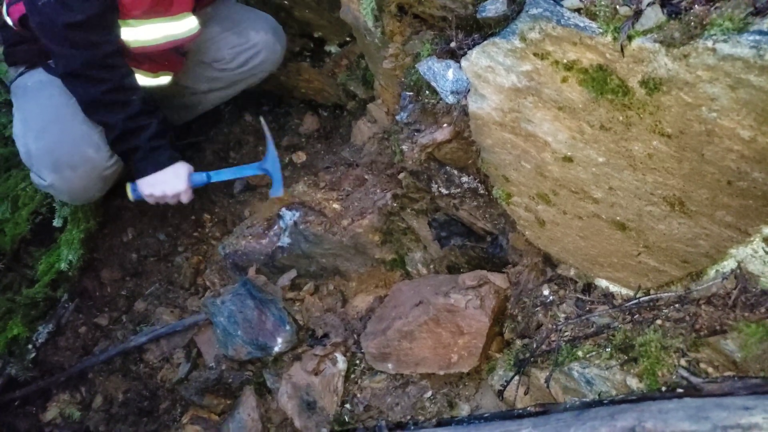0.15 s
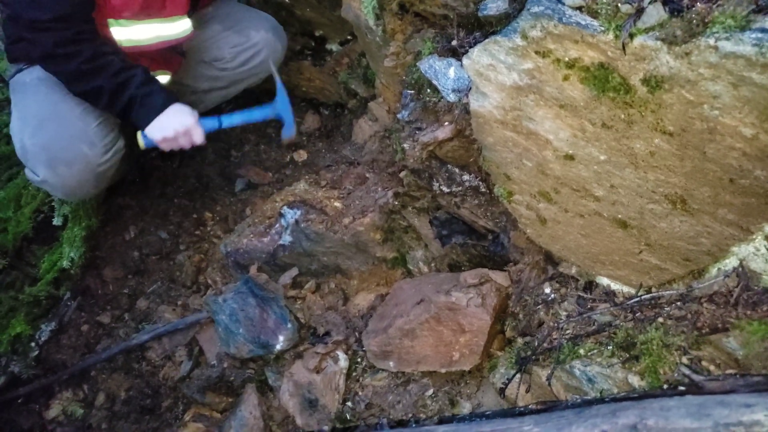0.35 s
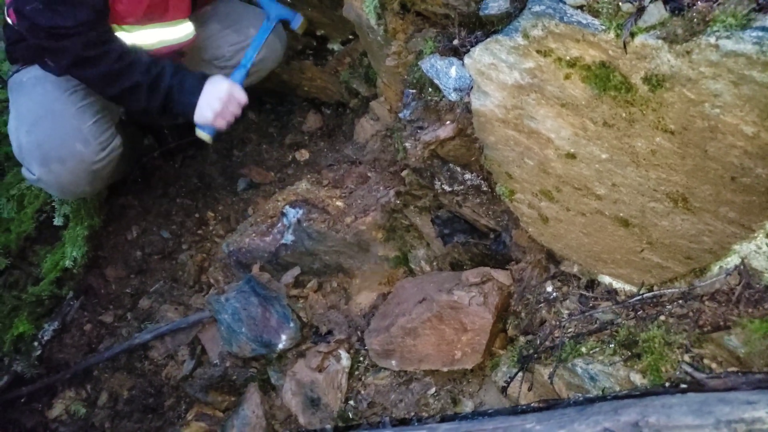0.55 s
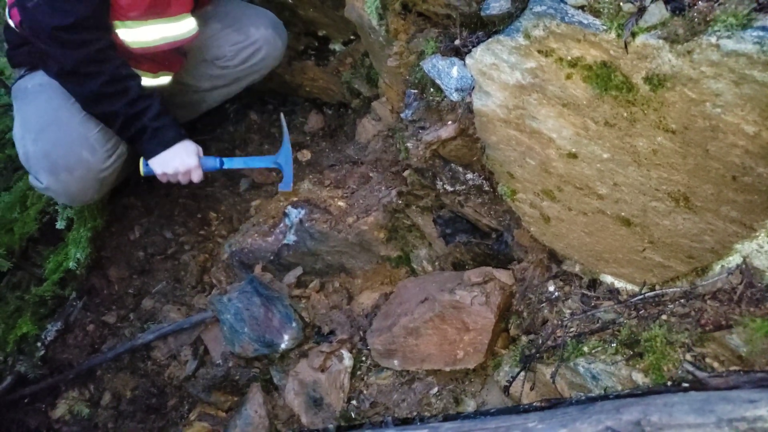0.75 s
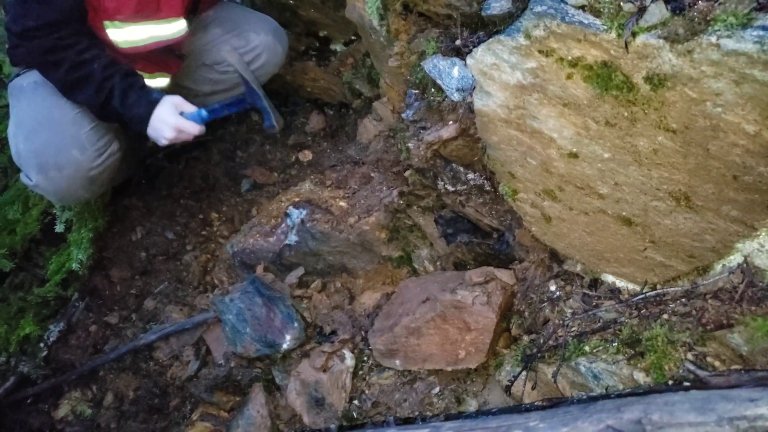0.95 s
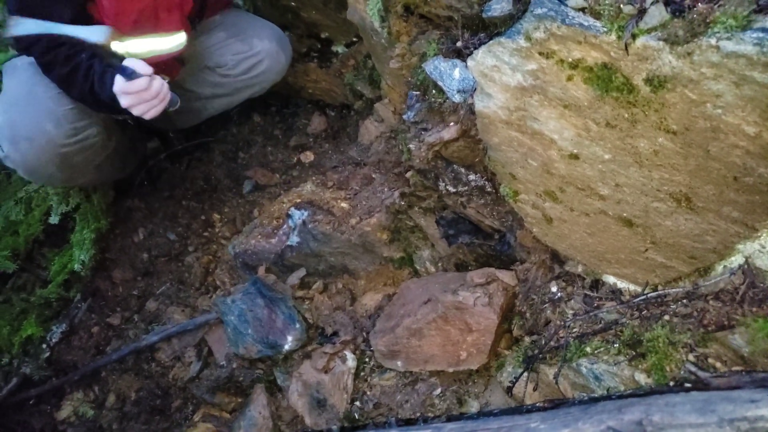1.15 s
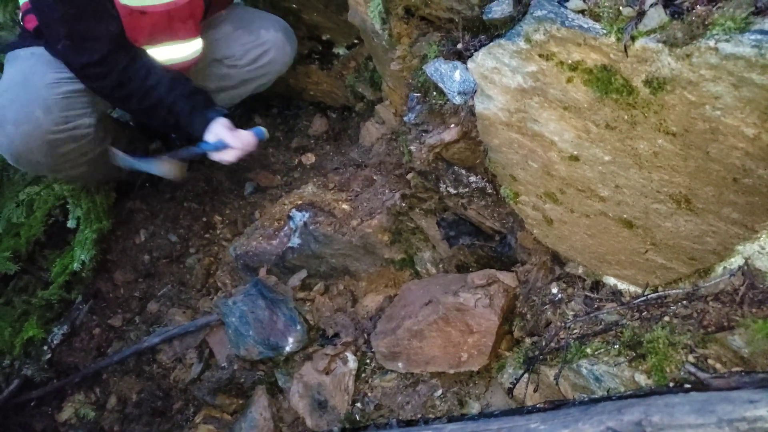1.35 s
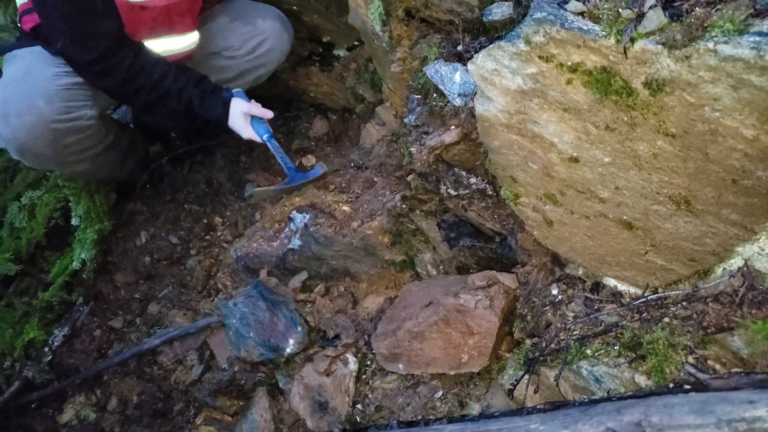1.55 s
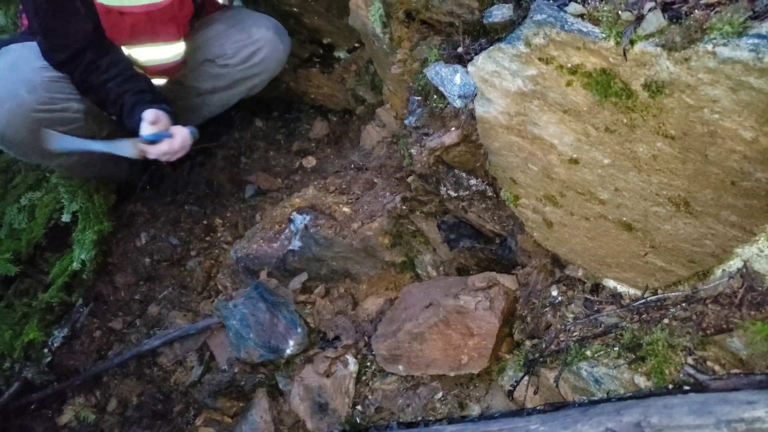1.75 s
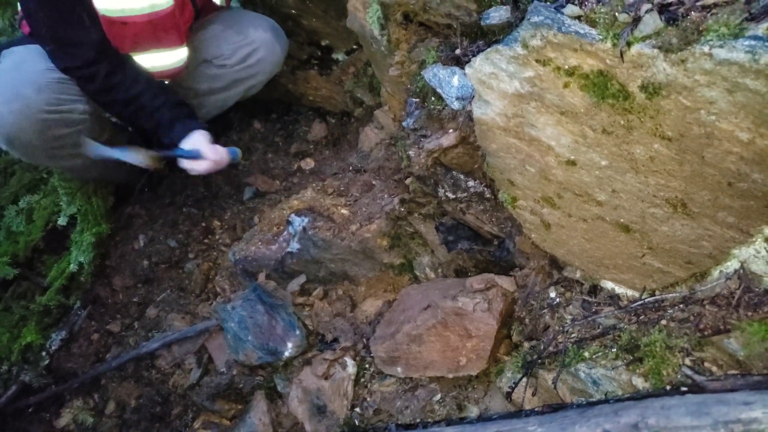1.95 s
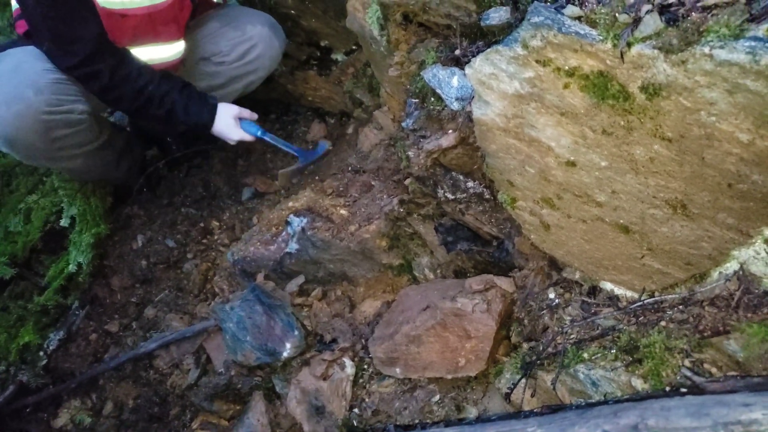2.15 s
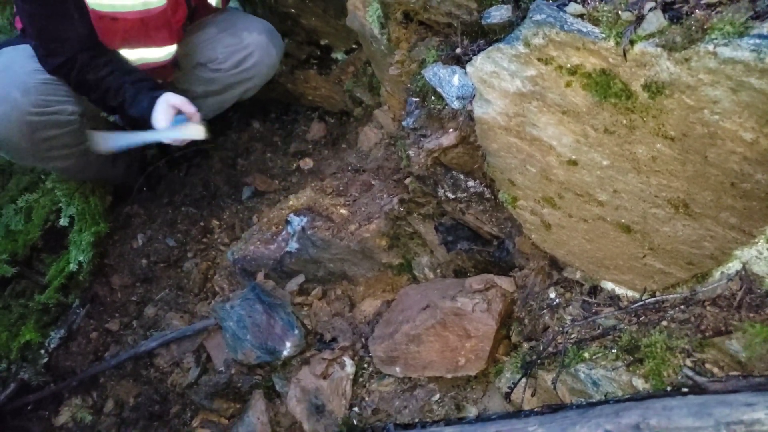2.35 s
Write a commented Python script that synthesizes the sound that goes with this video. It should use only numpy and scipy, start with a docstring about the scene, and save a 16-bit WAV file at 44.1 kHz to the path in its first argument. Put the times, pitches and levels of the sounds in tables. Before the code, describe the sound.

A steel pick strikes rock four times, close and slightly left, at about 0.2, 0.7, 1.5 and 2.1 seconds. Each blow is a dry crack with a short thud, a lighter rebound and a spray of grit; the first and third ring briefly. Small chips tick down between blows, most around 1 second. A sleeve swishes and flaps softly with the swings over a faint outdoor hush.

```python
"""Rock pick on stone

A steel pick strikes weathered rock four times, outdoors and close by, a little to the left.
Each blow is a dry crack over a thud of the ground; the head lands again more lightly and grit sprays.
Chips tick down between blows, and a sleeve swishes and flaps with the swing over a quiet hush."""
import sys
import numpy as np
from scipy import signal
from scipy.fft import rfft, irfft
from scipy.io import wavfile
from scipy.ndimage import uniform_filter1d

SR = 44100
rng = np.random.default_rng(int(sys.argv[2]) if len(sys.argv) > 2 else 0)


def put_to_file(sound):
    """Save the sound as 16-bit audio at rate SR, in the file named by the first command-line argument."""
    columns = np.atleast_2d(sound).T  # one column per channel
    safe = np.clip(columns, -1, 1)
    whole_steps = np.round(safe * 32767)
    wavfile.write(sys.argv[1], SR, whole_steps.astype(np.int16))


N = 105840

# The four blows. Middle and top colour the crack; a fade is the time taken to drop by 60 dB.
# start_s, crack_db, middle_db, top_db, thud_db, contact_hz, contact_db, steel_db, grit_db, crack_fade_s
BLOWS = [(0.2315, -9, -5, 0.5, -16.5, 5580, -6.5, -32, -40, 0.041),
         (0.7375, -10.5, 3.5, 1.5, -13.5, 14530, -19, -56, -45.5, 0.023),
         (1.4987, -13.5, -2, 5.5, -30.5, 6920, -18.5, -29, -45, 0.025),
         (2.1075, -12.5, 3.5, -1, -28.5, 1264, -18.5, -55, -45.5, 0.023)]
# Tone colour of crushing stone: pitch_hz, level_db
CRACK_COLOUR = [(100, -47), (400, 10), (750, -9), (1400, -0.5), (2000, 0), (3500, 0), (5000, -3),
                (7200, 3.5), (8800, -4.5), (11000, -5), (14800, -1.5), (16000, 8.5)]
# Ringing tones of the steel head: pitch_hz, level_db, fade_s
STEEL_TONES = [(6855, 0, .07), (6765, -12, .07)]
NO_TILT = ((1, 0), (2, 0))  # leaves a tone colour unchanged


def amp(db):
    """Turn decibels into a gain."""
    return 10 ** (np.asarray(db) / 20)


def unit(x):
    """Scale a signal to an average power of one."""
    return x / np.sqrt(np.mean(x ** 2) + 1e-20)


def curve_at(points, hz):
    """Read a curve at the given pitches, with octaves evenly spaced."""
    pitches, values = np.transpose(points)
    return np.interp(np.log(hz + 1), np.log(pitches + 1), values)


def add(mix, start_s, sound):
    """Mix a sound in at its start time."""
    part = mix[:, max(round(start_s * SR), 0):][:, :sound.shape[1]]
    part += sound[:, :part.shape[1]]


def noise(colour, size, tilt=NO_TILT):
    """Stereo noise, alike on both sides in the bass; tilt boosts or cuts parts of its colour."""
    # How alike left and right are: pitch_hz, likeness (0 to 1)
    likeness = [(30, .88), (80, .98), (300, .97), (800, .6), (1500, .25), (5000, .1), (15000, .1)]
    hz = np.fft.rfftfreq(size, 1 / SR)
    left, unrelated = np.exp(2j * np.pi * rng.random((2, len(hz))))
    alike = curve_at(likeness, hz)
    right = alike * left + np.sqrt(1 - alike ** 2) * unrelated
    spectrum = np.array([left, right]) * unit(amp(curve_at(colour, hz)))
    return irfft(spectrum * amp(curve_at(tilt, hz)), size) * np.sqrt(size)


def flicker(depth_db, size, grain_samples):
    """A gain that flickers at random, making noise sound rough."""
    wobble = unit(uniform_filter1d(rng.standard_normal(size), grain_samples))
    return unit(amp(depth_db * wobble))


def burst(colour, rise_s, fade_s, size, tilt=NO_TILT):
    """Noise that rises quickly and dies away."""
    t = np.arange(size) / SR
    fade = np.exp(-np.log(1000) * np.maximum(t - rise_s, 0) / fade_s)
    return noise(colour, size, tilt) * np.minimum(t / rise_s, 1) * fade


def ring(tones, rise_s, size=12000, right_delay_s=0.00025):
    """Fading tones, neighbours swinging opposite ways; they reach the right side a little later."""
    t = np.maximum(np.arange(size) / SR - np.array([[0], [right_delay_s]]), 0)
    waves = sum((-1) ** k * amp(db) * np.exp(-np.log(1000) * t / fade_s) * np.sin(2 * np.pi * hz * t)
                for k, (hz, db, fade_s) in enumerate(tones))
    return waves * np.minimum(t / rise_s, 1)


def from_left(sound, share):
    """Sound from the left is shaded on the right side, mostly in the treble."""
    # Full shading of the right side: pitch_hz, cut_db
    shade = [(100, .8), (280, 1.3), (550, 4.5), (1200, 6), (2500, 7), (5500, 9), (9000, 4), (14000, 4.3)]
    spectrum = rfft(sound)
    spectrum[1] *= amp(-share * curve_at(shade, np.fft.rfftfreq(N, 1 / SR)))
    return irfft(spectrum, N)


def hush(level_db=-62, left_louder_db=3.5):
    """Low outdoor rumble with a thin hiss."""
    # Tone colour of the outdoors: pitch_hz, level_db
    hush_colour = [(20, -30.5), (40, -11), (62, 5.5), (110, 2.5), (200, -8.5), (400, -16), (800, -16.5),
                   (1700, -40), (2900, -40.5), (7000, -24.5), (8800, -32.5), (14500, -24.5), (16000, -30.5)]
    sides = amp([[left_louder_db / 2], [-left_louder_db / 2]])
    return amp(level_db) * noise(hush_colour, N) * sides


def sleeve():
    """Cloth rubs as the arm swings, and its folds flap."""
    # Tone colour of rubbing cloth: pitch_hz, level_db
    rub_colour = [(60, 4.5), (200, 9), (500, 1), (1100, -2), (1900, 3.5), (3000, -7), (7200, -4),
                  (9000, -12), (13000, -8), (15500, 2)]
    # Loudness of the rubbing as the arm moves: time_s, level_db
    swing = [(0, -59.5), (0.2, -54), (0.45, -68), (0.62, -73.5), (0.691, -60), (0.8, -65.5), (1.0, -57.5),
             (1.19, -65), (1.25, -57), (1.32, -50.5), (1.46, -51.5), (1.58, -57), (1.7, -67.5),
             (1.97, -67.5), (2.039, -56), (2.16, -59), (2.3, -64.5), (2.39, -54)]
    # Tone colour of a flap: pitch_hz, level_db
    flap_colour = [(50, -19), (180, 7), (400, -12.5), (850, -4), (1400, -31), (4000, -49), (15000, -55)]
    # Soft flaps of cloth: start_s, level_db
    flaps = [(0.175, -44), (0.198, -47), (1.216, -49), (1.288, -48), (1.317, -51), (1.362, -49.5),
             (1.384, -50), (1.404, -47), (1.436, -47), (1.566, -54), (1.616, -52.5), (1.806, -48.5),
             (1.835, -49.5), (1.866, -50), (2.367, -63.5)]
    times_s, levels_db = np.transpose(swing)
    swell = amp(np.interp(np.arange(N) / SR, times_s, levels_db))
    out = noise(rub_colour, N) * swell * flicker(depth_db=1.5, size=N, grain_samples=300)
    for start_s, level_db in flaps:
        add(out, start_s, amp(level_db) * burst(flap_colour, rise_s=0.001, fade_s=0.041, size=4096))
    return out


def chips(crumbs_per_s=68, faintest_db=-69.5, spread_db=4.5):
    """Chips tick on the stones; finer crumbs trickle at random."""
    # Falling chips: start_s, level_db, body_db (boost of the lower pitches)
    falls = [(0.378, -56, -8), (0.431, -49.5, -15), (0.503, -53, -25), (0.579, -59, -37), (0.656, -55, -8),
             (0.827, -51.5, 14), (0.868, -67, -12), (0.941, -48.5, -15), (0.9486, -40.5, -8),
             (0.948, -51, 26), (1.039, -43, -18), (1.058, -50, -16), (1.083, -47.5, -20),
             (1.098, -44.5, -16), (1.106, -41.5, -23), (1.126, -47, -18), (1.559, -45, -18),
             (1.634, -60, -21), (1.659, -52.5, -17), (1.679, -46.5, -3), (1.743, -55.5, -6),
             (2.156, -67, 2), (2.1732, -48, 23.5), (2.176, -48, 16), (2.2035, -47, 2), (2.215, -57, 4),
             (2.24, -50.5, -3)]
    # Tone colour of a tick: pitch_hz, level_db
    tick_colour = [(200, -29.5), (1500, -18.5), (3300, -7), (5000, 1), (7300, 2.5), (9000, -11),
                   (12000, -1.5), (15000, -3)]
    crumbs = [(when * N / SR, faintest_db - spread_db * np.log(max(chance, 0.03)), 0)
              for when, chance in rng.random((round(crumbs_per_s * N / SR), 2))]
    out = np.zeros((2, N))
    for start_s, level_db, body_db in falls + crumbs:
        tilt = [(2500, body_db), (5000, 0.0076)]
        tick = burst(tick_colour, rise_s=0.00027, fade_s=0.029, size=2048, tilt=tilt)
        add(out, start_s, amp(level_db) * tick)
    return out


def grit(rise_s=0.0085, soil_db=-44.5, size=20000):
    """Each blow throws a spray of fine grit and shakes the loose soil."""
    # Tone colour of the spray: pitch_hz, level_db
    spray_colour = [(100, 8), (300, 4.5), (800, 2), (2000, 4), (4000, 8), (7000, 7.5), (8800, -4),
                    (12000, 1.5), (15000, 7.5)]
    # Tone colour of shaken soil: pitch_hz, level_db
    soil_colour = [(30, -15), (70, -1), (150, 11), (320, 2.5), (600, -3.5), (1200, -17.5), (8000, -40.5)]
    out = np.zeros((2, N))
    for start_s, *_, grit_db, _ in BLOWS:
        spray = burst(spray_colour, rise_s, fade_s=0.33, size=size)
        spray *= flicker(depth_db=2, size=size, grain_samples=60)
        soil = burst(soil_colour, rise_s, fade_s=0.21, size=size)
        add(out, start_s, amp(grit_db) * spray + amp(soil_db) * soil)
    return out


def thud(low_cut_hz=102.6):
    """A short, low thud of the ground, with the deepest bass cut away."""
    # Low tones of the rock: pitch_hz, level_db, fade_s
    ground_tones = [(155.7, 0.5, 0.029), (252, -3.5, 0.037), (297.7, -2.5, 0.042), (442, -14.5, 0.047),
                    (543.7, -6, 0.027), (888, -26.5, 0.046)]
    bass_cut = signal.butter(2, low_cut_hz, "high", fs=SR, output="sos")
    return signal.sosfilt(bass_cut, ring(ground_tones, rise_s=0.0016))


def rebounds():
    """The head drops back on the rock with a softer, scraping knock."""
    # Second landings: start_s, scrape_db, rise_s, thud_db, steel_db
    landings = [(0.258, -35.5, 0.0096, -35, -53), (0.765, -32, 0.0043, -30.5, -62.5),
                (1.5217, -25, 0.0044, -41.5, -36), (2.1269, -19.5, 0.00078, -39, -49)]
    out = np.zeros((2, N))
    for start_s, scrape_db, rise_s, thud_db, steel_db in landings:
        scrape = burst(CRACK_COLOUR, rise_s, fade_s=0.034, size=12000, tilt=[(2500, 1), (5000, 0.0096)])
        steel = amp(steel_db) * ring(STEEL_TONES, rise_s)
        add(out, start_s, amp(scrape_db) * scrape + steel + amp(thud_db) * thud())
    return out


def blows(rise_s=0.0008, contact_fade_s=0.021, size=12000):
    """Stone crushes under the steel; stone and head ring briefly and the ground thuds."""
    # Ringing tones of the struck stone face: pitch_hz, level_db, fade_s
    stone_tones = [(1345, -12, 0.022), (1725, -17.5, 0.035), (2618, -19.5, 0.045), (3055, -13, 0.02),
                   (4174, -19.5, .03), (4610, -16.5, 0.027), (4830, -10, 0.018), (5430, -11, 0.019),
                   (6860, -16.5, 0.025), (7800, -15.5, 0.015), (12370, -20.5, 0.021), (13840, -24, 0.014),
                   (15700, -19, .028)]
    out = np.zeros((2, N))
    for (start_s, crack_db, middle_db, top_db, thud_db,
         contact_hz, contact_db, steel_db, _, crack_fade_s) in BLOWS:
        tilt = [(1500, middle_db), (4500, 0.0059), (7500, 0.014), (11000, top_db)]
        crush = burst(CRACK_COLOUR, rise_s, crack_fade_s, size, tilt)
        crush *= flicker(depth_db=3.3, size=size, grain_samples=16)
        crack = amp(crack_db) * (crush + ring(stone_tones, rise_s))
        contact = ring([(contact_hz, contact_db, contact_fade_s)], rise_s)
        steel = amp(steel_db) * ring(STEEL_TONES, rise_s)
        add(out, start_s, crack + contact + steel + amp(thud_db) * thud())
    return out


def scene():
    """The blows come from the left over the hush; the smaller sounds sit nearer the middle."""
    out = hush() + from_left(blows(), share=1)
    small_sounds = rebounds() + grit() + chips() + sleeve()
    return out + from_left(small_sounds, share=0.75)


def record(dry, top_hz=15550):
    """Cut away the very highest treble."""
    treble_cut = signal.firwin(255, top_hz, window=("kaiser", 8), fs=SR)
    return signal.oaconvolve(dry, treble_cut[None], "same")


dry = scene()
out = record(dry)
put_to_file(out)
```